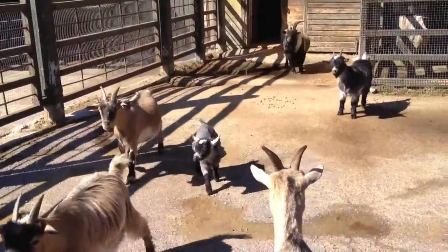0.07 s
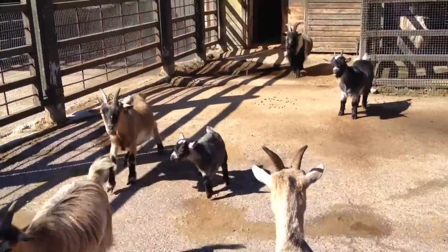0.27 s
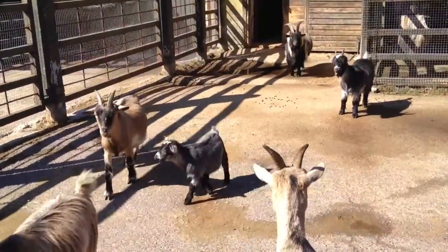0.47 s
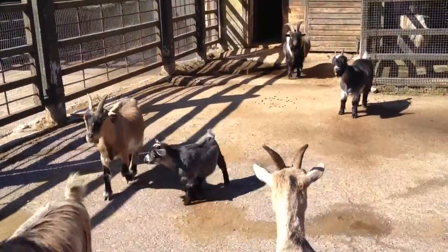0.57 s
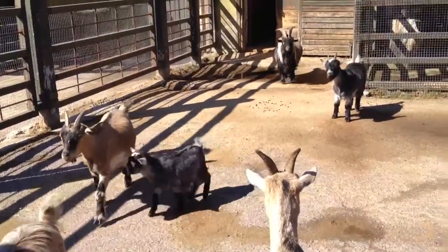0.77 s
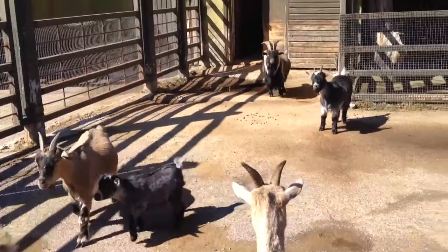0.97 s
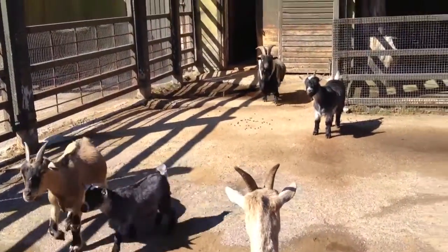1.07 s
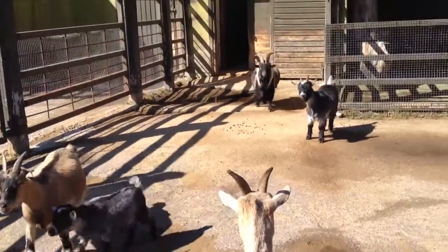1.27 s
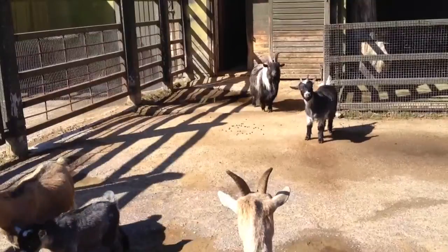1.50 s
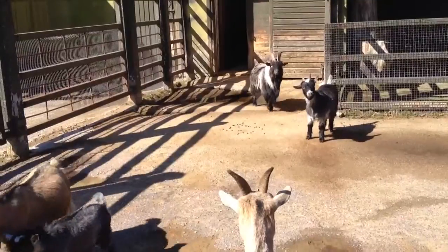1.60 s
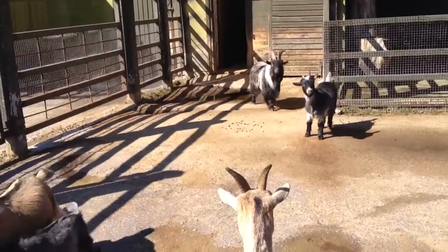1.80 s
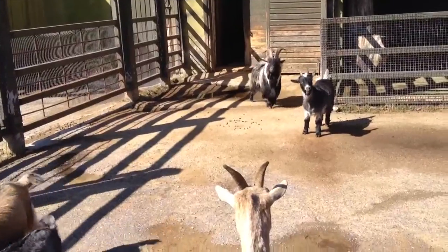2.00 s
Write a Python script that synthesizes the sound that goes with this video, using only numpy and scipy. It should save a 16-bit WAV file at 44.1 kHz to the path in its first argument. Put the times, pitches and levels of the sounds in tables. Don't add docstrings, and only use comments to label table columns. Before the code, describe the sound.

One goat bleats loudly and harshly close by, buzzing at first, cracking up to a ringing squeal, then sagging to a nasal hum; low wind and handling thumps follow over faint outdoor hiss and small hoof scuffs.

```python
import sys
import numpy as np
from scipy import signal
from scipy.fft import rfft, irfft
from scipy.io import wavfile
from scipy.ndimage import uniform_filter1d

SR = 44100
rng = np.random.default_rng(int(sys.argv[2]) if len(sys.argv) > 2 else 0)


def makeup_ratio(level_db):
    decades = np.asarray(level_db, float) / 20
    return 10 ** decades


def to_wav(s):
    ch = np.atleast_2d(s).T
    pcm = np.round(np.clip(ch, -1, 1) * 32767)
    wavfile.write(sys.argv[1], SR, pcm.astype(np.int16))


N = 90404
TIME = np.arange(N) / SR


def rms_one(x):
    return x / np.sqrt(np.mean(x ** 2) + 1e-20)


def in_time(rows):
    s, *columns = np.transpose(rows)
    return [np.interp(TIME, s, c) for c in columns]


def gate(rows):
    inside = np.minimum(TIME - rows[0][0], rows[-1][0] - TIME)
    return np.clip(inside / .015, 0, 1)


def band(x, low_hz, high_hz):
    sos = signal.butter(2, [low_hz, min(high_hz, .45 * SR)], "band", fs=SR, output="sos")
    return signal.sosfilt(sos, x)


def drift(rate_hz):
    r = np.exp(-2 * np.pi * rate_hz / SR)
    settle = 9000
    walk = signal.lfilter([1], [1, -2 * r, r * r], rng.standard_normal(N + settle))
    return rms_one(walk[settle:])


def cycles(hz):
    return 2 * np.pi * np.cumsum(hz) / SR


# (frequency [Hz], level [dB per Hz])
YARD_SPECTRUM = [(250, -2), (600, -6.5), (1500, -11.5), (4000, -16), (8000, -18), (13000, -22),
                 (15600, -10.5)]


def yard():
    hz = np.arange(1, N // 2 + 2) * SR / N
    at, db = np.transpose(YARD_SPECTRUM)
    tilt = makeup_ratio(np.interp(np.log(hz), np.log(at), db))
    noise = irfft(rfft(rng.standard_normal(N)) * tilt * np.minimum(hz / 200, 1) ** 2, N)
    return makeup_ratio(-54.5 + 0.13 * drift(3.5)) * rms_one(noise)


# (centre time [s], peak level [dB], pitch [Hz], length [cycles])
THUMPS = [(0.029, -41, 180, 2.3), (0.269, -35.5, 145, 0.71), (.608, -17.5, 205, 0.84),
          (0.697, -29, 183, 1.1), (1.151, -28.5, 194, 1.8), (1.163, -23.5, 256, 1.13),
          (1.185, -22, 175.6, 2.26), (1.212, -26.5, 212, 1.3), (1.276, -27.5, 173, 1.5),
          (1.3, -52, 235, 1.9), (1.316, -15.5, 240, 0.83), (1.345, -31.5, 225.2, 5.84),
          (1.381, -22.5, 205.5, 2.9), (1.399, -21, 191, 2.6), (0.193, -44, 130, 1.3),
          (1.56, -25.5, 166, 1.46), (1.641, -29.5, 207, 1.4), (1.671, -29.5, 167, 1.3),
          (1.693, -29.5, 180, 1.3), (1.714, -33, 207, 1.5), (1.747, -25, 227, 1.4), (1.762, -29, 163, 2.7),
          (1.801, -29, 145, 2), (1.821, -34.5, 222, 3.6), (1.876, -37.5, 164, 5.9),
          (1.915, -31.5, 194, 0.93), (1.959, -39, 156, 4.9), (2.043, -35, 174, 3.6), (0.472, -44, 123, 3.3),
          (.619, -25, 200, 3), (.65, -47, 150, 3.3), (.74, -45, 140, 2), (1.172, -27.5, 151, 2.1),
          (0.061, -50, 175, 1.1)]
# (time [s], level [dB])
GUST = [
    (0, -62),
    (.7, -58.5),
    (1.15, -58.5),
    (1.4, -39),
    (1.46, -55.5),
    (1.63, -48.5),
    (1.93, -47.5),
    (2.05, -64),
]


def thumps():
    knocks = np.zeros(N)
    for s, db, hz, turns in THUMPS:
        u = (TIME + 0.0011 - s) * hz
        swell = np.exp(-(u / (turns * np.where(u < 0, .35, .55))) ** 2)
        falling_pitch = 1 - 0.18 * np.tanh(u)
        knocks += makeup_ratio(db) * swell * np.cos(2 * np.pi * u * falling_pitch + 1.0)
    gust_db, = in_time(GUST)
    rumble = rms_one(band(band(rng.standard_normal(N), 118, 296), 81, 900))
    deep = band(rng.standard_normal(N), 67, 130) * uniform_filter1d(np.abs(knocks), size=900)
    bent = knocks + 0.99 * np.abs(knocks) * knocks / 0.14
    port = signal.butter(2, 125.5, "high", fs=SR, output="sos")
    return signal.sosfilt(port, bent) + makeup_ratio(gust_db + 2.0 * drift(20)) * rumble + makeup_ratio(5.5) * deep


# (frequency [Hz], width [Hz], depth [0-1])
NOTCHES = [(2250, 190, 0.7), (5030, 220, 0.4)]


def throat(table, hz):
    nasal = 1
    for at, width, depth in NOTCHES:
        nasal = nasal * (1 - np.clip(depth, 0, 1) / (1 + ((hz - at) / width * 2) ** 2))
    resonances = sum(makeup_ratio(db) / (1 + 1j * (hz ** 2 - top ** 2) / (width * hz + 1e-9))
                     for top, width, db in table)
    u = 1j * hz / 5460
    return nasal * resonances / (1 + u + u * u) ** 2


def folds(rows, table, hum_phase, jitter, beat, breath):
    hz, db, rough = in_time(rows)
    wander = drift(30.3) / 800 + jitter * rough ** 2 * drift(120)
    phase = cycles(hz * (1 + wander)) + beat * rough * np.sin(hum_phase)
    pulses = sum(np.cos(k * phase) * (k * hz < 11000) for k in range(1, 34))
    beating = beat * rough * (0.6 * np.cos(2 * hum_phase) + 0.2 * np.cos(3 * hum_phase))
    pulses = pulses / np.sqrt(5500 / hz) * (1 + beating + 0.05 * rough * drift(83))
    air = breath * rough * rng.standard_normal(N) * (1 + 0.081 * np.cos(phase))

    bins = np.arange(N // 2 + 1) * SR / N
    shaped = rfft(pulses + air) * throat(table, bins)
    region = np.minimum(bins / 800, 8)
    voiced = np.zeros(N)
    for k in range(9):
        share = np.maximum(1 - np.abs(region - k), 0)
        voiced += irfft(shaped * share, N) * makeup_ratio(1.8 * drift(16.6))
    levelled = voiced / np.sqrt(uniform_filter1d(voiced ** 2, size=2000) + 1e-9)
    return gate(rows) * makeup_ratio(db) * levelled


# (time [s], pitch [Hz], level [dB], roughness [0-1])
BRAY = [(.105, 299.2, -57, 0.27), (.148, 302, -45.5, 0.62), (.174, 305.6, -47.5, 0.54),
        (.198, 321, -35, .28), (.228, 338, -31.5, .36), (.258, 337, -32, .16), (.29, 351, -31, .16),
        (.32, 371, -33, .14), (.335, 423, -29, 0.86), (.385, 442.7, -30, 0.59), (.46, 448, -29, 0.52),
        (.5, 448.6, -31, 0.69), (.55, 473.8, -29, 0.91), (.66, 438, -53.5, 0.88)]
# (frequency [Hz], width [Hz], level [dB])
BRAY_THROAT = [(378, 320, -0.5), (1030, 95, 7.5), (1360, 720, 4), (1706, 54, 1), (2384, 210, 2.5),
               (2970, 610, 1.5), (3454, 100, 0.5), (3840, 320, 3.5), (4525, 270, 4), (5540, 160, -3),
               (7260, 900, -2.5), (10100, 1900, -3.5)]


def bray(hum_phase):
    return folds(BRAY, BRAY_THROAT, hum_phase, jitter=0.03532, beat=0.39, breath=1.0)


# (start time [s], level [dB], pitch [Hz], t60 [s])
CRACKS = [(.462, -36, 700, .08), (1.15, -34, 1000, .065), (.312, -44, 545, .08), (1.15, -47, 1900, .045),
          (.478, -44, 1950, .1), (1.411, -44, 740, .022), (1.413, -52, 2150, .025), (1.341, -41, 450, .035),
          (.152, -56, 310, .15), (1.39, -45, 620, .025), (.51, -44, 1100, .07), (.54, -46, 2000, .05),
          (1.135, -50, 1300, .06), (.275, -47, 1070, .2), (.66, -58, 610, .4), (.585, -45, 1300, .06)]


def cracks():
    out = np.zeros(N)
    wobble = .5 * drift(118.6)
    for s, db, hz, t60 in CRACKS:
        age = np.maximum(TIME - s, 0)
        attack = 1 - np.exp(-age * 8 / t60)
        ring = np.sin(2 * np.pi * hz * age + wobble * hz / 1000)
        out += makeup_ratio(db + 18.5 - 60 * age / t60) * attack * ring
    return out


# (start time [s], length [s], level [dB], centre [Hz])
SCUFFS = [(0.963, 0.07, -53, 9000), (1.052, 0.016, -47, 7800), (1.126, .01, -48, 6500),
          (1.113, .006, -53, 6500), (1.145, .032, -49, 3800), (1.204, .008, -50, 4000),
          (.158, .006, -53, 8500), (1.54, .008, -53, 1900), (1.24, 0.07, -56, 3200),
          (1.31, 0.05, -54, 9500), (1.27, .04, -58, 10000), (1.99, .05, -60, 4000),
          (1.361, .006, -55, 7930), (1.404, 0.022, -47, 9100), (1.4135, 0.004, -40, 6500),
          (1.612, 0.09, -52.5, 7000), (1.815, 0.023, -56.5, 4630), (1.956, 0.0054, -52, 4950),
          (1.436, 0.012, -53, 1190)]


def scuffs():
    out = np.zeros(N)
    grit = rng.standard_normal(N) * makeup_ratio(1.0 * drift(270))
    for s, length, db, hz in SCUFFS:
        u = (TIME - s) / length
        envelope = np.clip(u * 6, 0, 1) * np.exp(-np.maximum(u, 0) ** 3)
        out += makeup_ratio(db) * rms_one(band(grit, hz / 6.2, hz * 1.45)) * envelope
    return out


# (time [s], pitch [Hz], level [dB])
HUM = [(.29, 289.5, -94), (.33, 263.6, -40), (.38, 249.3, -102.5), (.435, 304.8, -64.5),
       (.46, 298.7, -50.5), (.57, 293.7, -47), (.65, 289.5, -50), (.7, 305.9, -51.5), (.79, 289.2, -48),
       (.89, 275.1, -71), (.93, 239.4, -62), (.99, 268.8, -43), (1.08, 261, -86), (1.13, 300.9, -41),
       (1.29, 299.4, -43.5), (1.43, 266.8, -46.5), (1.54, 255.5, -57)]
HUM_PARTIALS_DB = [2, -18.5, -16.5, -23, -23, -22.5]


def hum():
    hz, db = in_time(HUM)
    phase = cycles(hz * (1 + 0.0056 * drift(60)))
    tone = sum(makeup_ratio(p) * np.sin(k * phase) for k, p in enumerate(HUM_PARTIALS_DB, 1))
    return gate(HUM) * np.sqrt(2) * makeup_ratio(db) * tone, phase


def mouth(table, hz):
    return sum(makeup_ratio(db) / (1 + (2 * (hz - top) / width) ** 2) for top, width, db in table)


# (time [s], pitch [Hz], level [dB])
SQUEAL = [(.535, 717.6, -40.5), (.585, 751, -28), (.614, 799.7, -26.5), (.665, 803.8, -27.5),
          (.73, 757.8, -27.5), (.832, 767.2, -27.5), (.944, 736, -32.5), (.988, 692, -38.5),
          (1.02, 694, -37.5), (1.115, 626, -43), (1.15, 589, -29), (1.18, 554, -57)]
# (frequency [Hz], width [Hz], level [dB])
OPEN_MOUTH = [(825, 320, -1.5), (1604, 240, -9), (2150, 580, -21), (3283, 200, -10.5), (3620, 330, -23.5),
              (4620, 400, -20.5), (5530, 190, -20.5), (6350, 450, -27.5), (7490, 1170, -32),
              (9700, 7500, -51.5)]
# (frequency [Hz], width [Hz], level [dB])
CLOSING_MOUTH = [(672, 134, -3), (1180, 250, -12.5), (1874, 360, -3), (2940, 340, -21.5),
                 (3880, 380, -21.5), (4510, 280, -5.5), (5700, 290, -21), (6360, 350, -15.5),
                 (7400, 800, -26), (9500, 2500, -41)]


def squeal(hum_phase):
    hz, db = in_time(SQUEAL)
    phase = cycles(hz * (1 + drift(60) / 500))
    shut = np.clip((TIME - 0.922) / 0.064, 0, 1)
    slack_db = -0.298 * np.maximum(634 - hz, 0)
    tone = np.zeros(N)
    for k in range(1, 16):
        gain = (1 - shut) * mouth(OPEN_MOUTH, k * hz) + shut * mouth(CLOSING_MOUTH, k * hz)
        flicker_db = (1 + k / 3) * drift(15) + slack_db * (k > 3 or k == 1)
        blur = k / 21 * drift(150)
        beating = (k - 1) * 0.08 * (1 - shut) * np.sin(hum_phase)
        tone += gain * makeup_ratio(flicker_db) * np.cos(k * phase + 1.3 * k * k + blur + beating)
    return gate(SQUEAL) * np.sqrt(2) * makeup_ratio(db) * tone


# (time [s], pitch [Hz], level [dB], roughness [0-1])
RASP = [
    (.6, 957, -34, 0.8),
    (.68, 974, -37, 0.7),
    (.76, 1007, -29.5, 0.3),
    (.82, 1048, -37, 0.76),
    (.92, 1030, -37, 0.37),
    (.95, 1030, -56, 0.72),
    (1.05, 1030, -50, 0.86),
]
# (frequency [Hz], width [Hz], level [dB])
RASP_THROAT = [(1036, 250, 36.5), (1270, 41, -12), (1776, 170, 30), (3060, 180, 2.5), (4970, 440, -14)]


def rasp(hum_phase):
    return folds(RASP, RASP_THROAT, hum_phase, jitter=0.22, beat=0.46, breath=1.73)


def echoes(x):
    out = np.zeros(N)
    for lag_s, db in [(.0003, -13), (.007, -27), (.023, -21), (.041, -20)]:
        lag = int(lag_s * SR)
        out[lag:] += makeup_ratio(db) * x[:-lag]
    return band(x + band(out, 290, 8400), 152, 15000)


def scene():
    nasal, hum_phase = hum()
    goat = bray(hum_phase) + cracks() + nasal + squeal(hum_phase) + rasp(hum_phase)
    low = thumps()
    duck = makeup_ratio(-30 * uniform_filter1d(np.abs(low), size=1300))
    return (duck * yard() + low + scuffs() + echoes(goat))[None]


def top_cut(x):
    return signal.sosfilt(signal.butter(12, 15680, fs=SR, output="sos"), x)


def record(dry):
    low_pass = signal.cheby2(12, 70, 15780, fs=SR, output="sos")
    mix = signal.sosfilt(low_pass, dry)
    return top_cut(mix)


dry = scene()
out = record(dry)
to_wav(out)
```